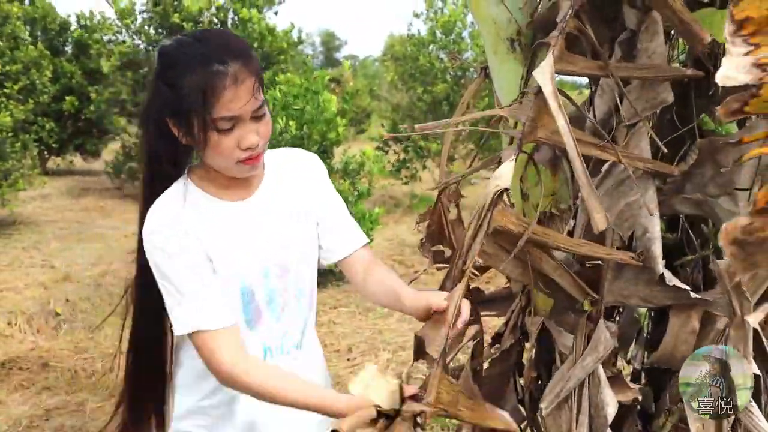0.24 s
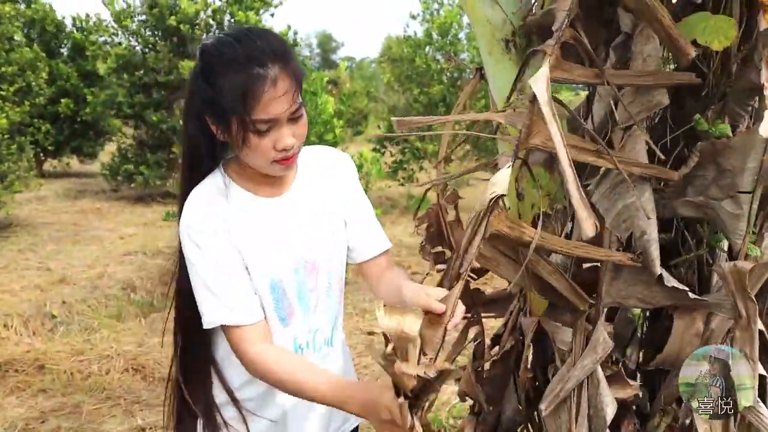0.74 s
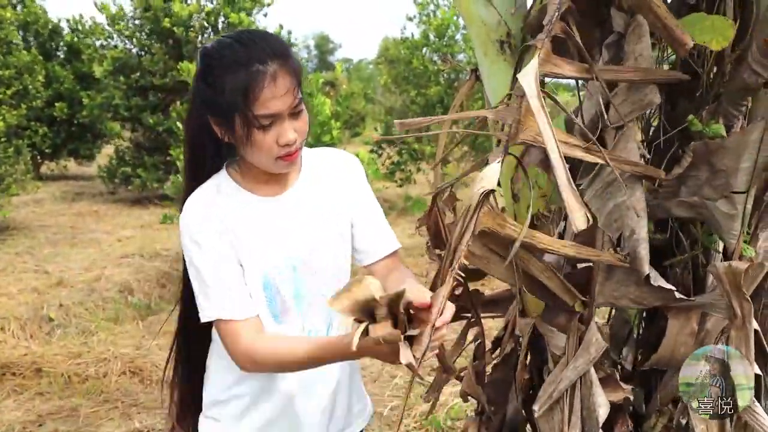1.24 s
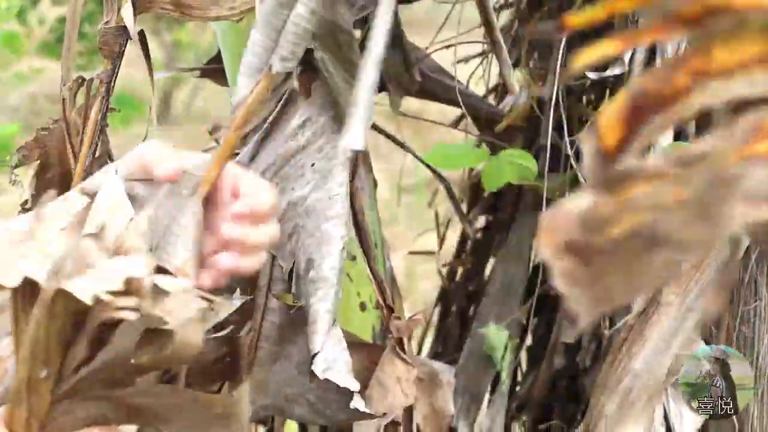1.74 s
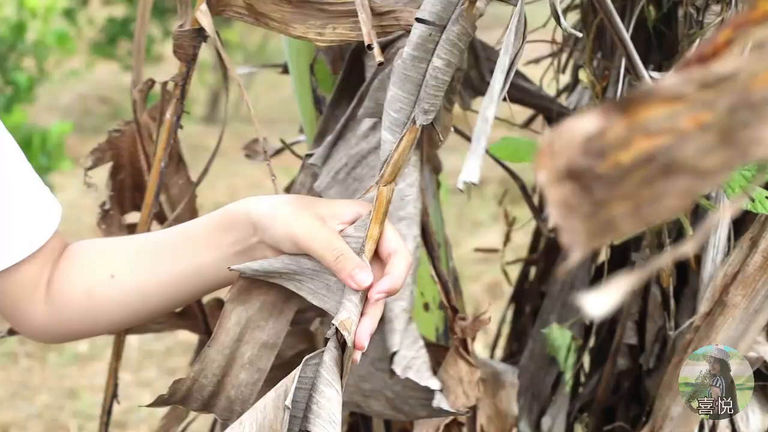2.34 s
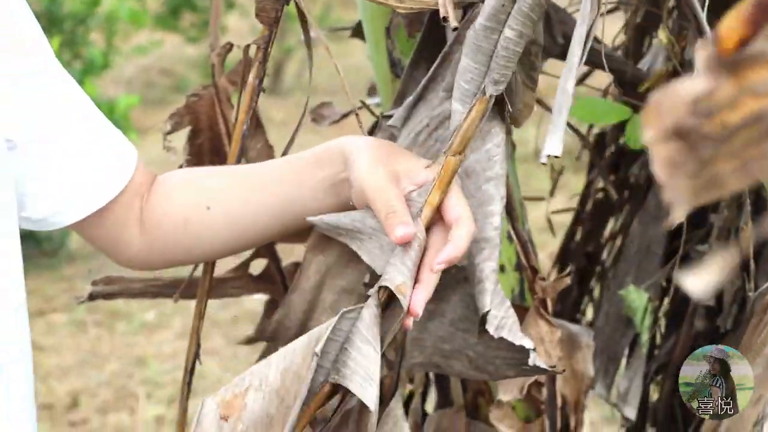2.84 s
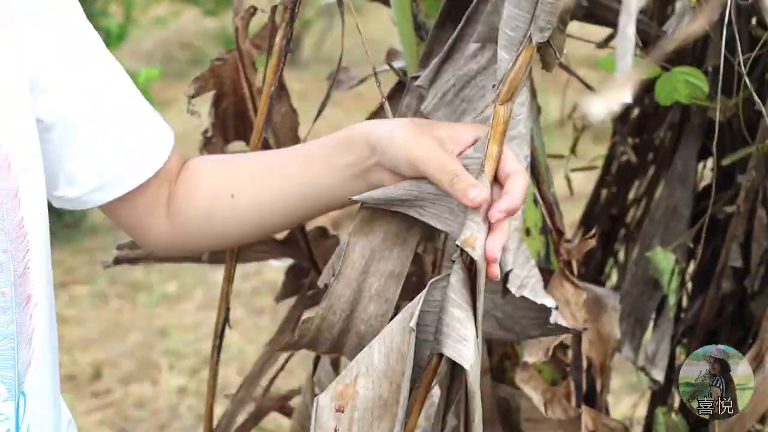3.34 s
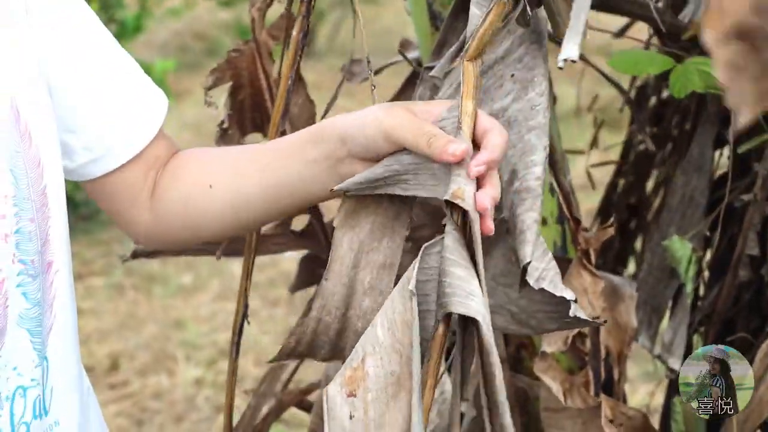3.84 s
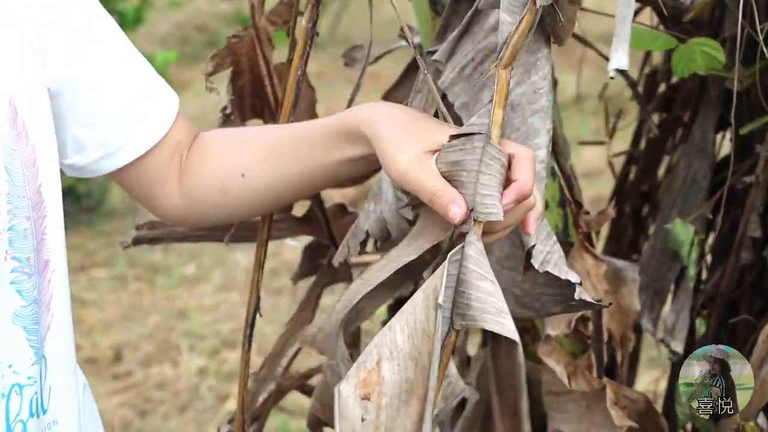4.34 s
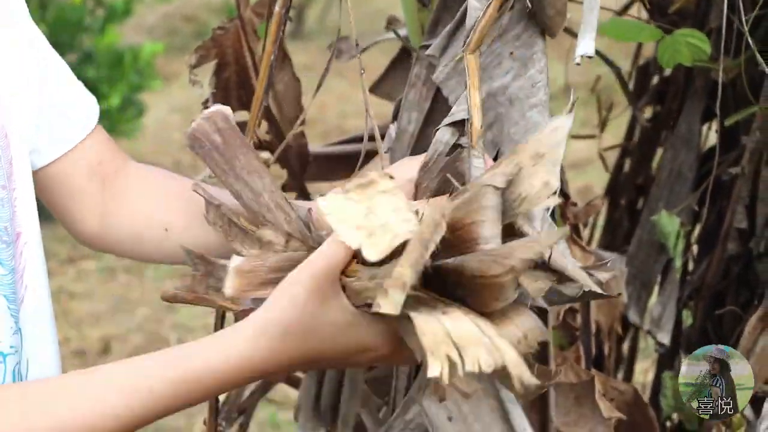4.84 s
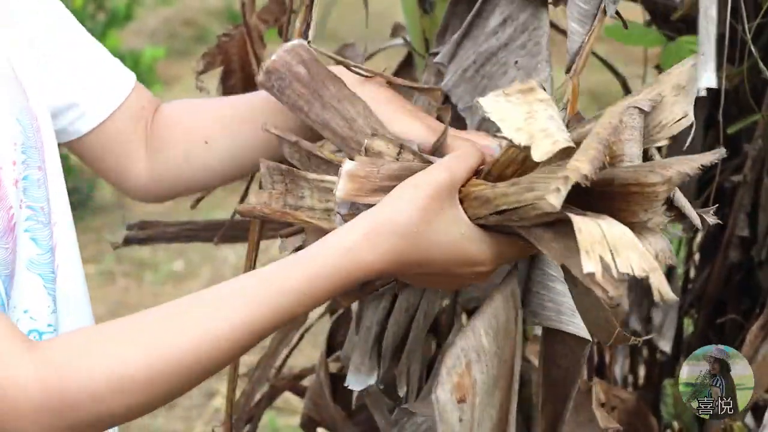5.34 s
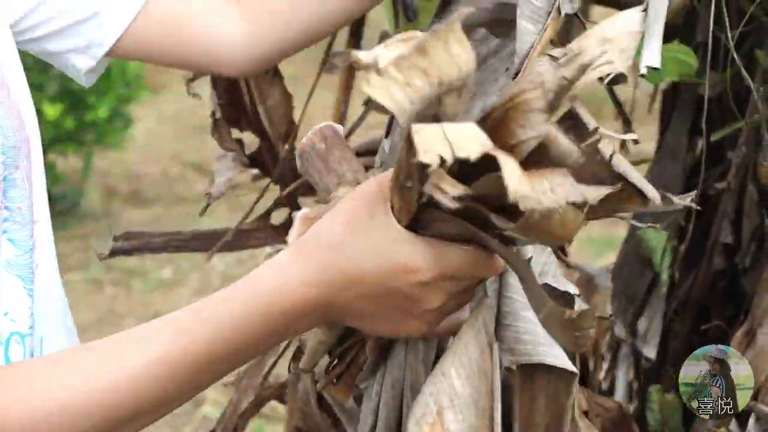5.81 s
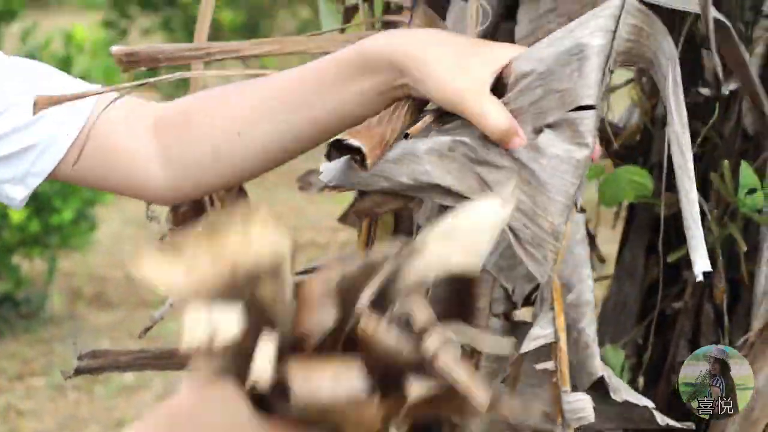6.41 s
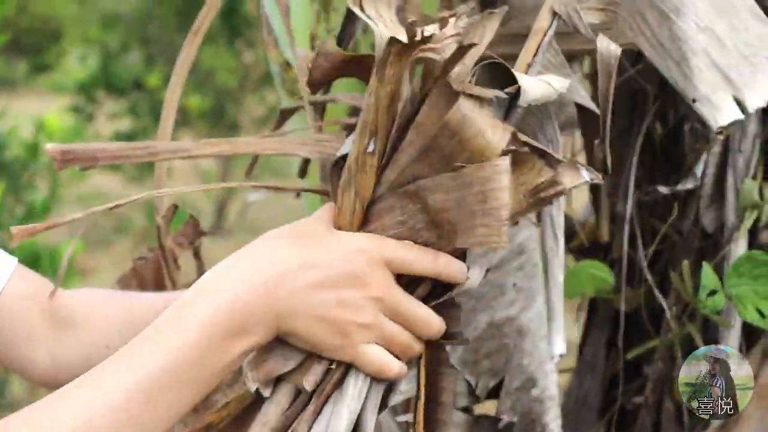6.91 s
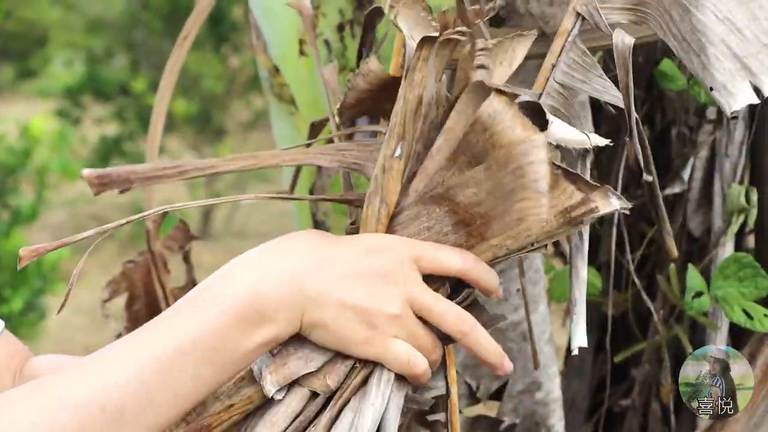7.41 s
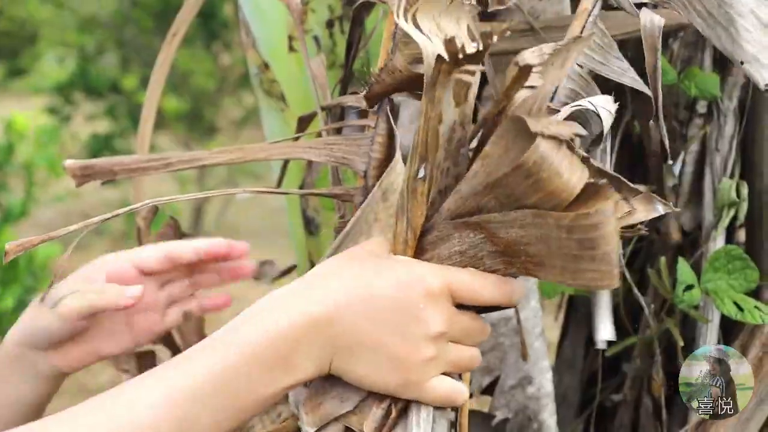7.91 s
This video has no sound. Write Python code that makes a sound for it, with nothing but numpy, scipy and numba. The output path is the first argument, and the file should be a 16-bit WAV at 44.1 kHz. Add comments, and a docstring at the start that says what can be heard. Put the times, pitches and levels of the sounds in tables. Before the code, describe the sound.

Dry dead leaves crackle, snap and rustle as they are pulled and crushed by hand, with wind rumbling on the microphone.

```python
"""Dry leaves pulled off a stalk and crushed into a bundle.

Each crack is a sputtering burst of fibre fractures that rings the stiff blade. Countless small cracks
and rubbing make the rustle; the bundle drums dully under both, and leaf edges scrape now and then.
Wind buffets the microphone over a faint open-air hush."""
import sys
import numpy as np
from scipy import signal
from scipy.fft import rfft, irfft
from scipy.io import wavfile
from scipy.ndimage import uniform_filter1d
from numba import njit

SR = 44100
rng = np.random.default_rng(int(sys.argv[2]) if len(sys.argv) > 2 else 0)


def int16_out(signal):
    """Quantize to a 16-bit WAV file."""
    q = np.round(np.clip(np.atleast_2d(signal).T, -1, 1) * 32767)
    wavfile.write(sys.argv[1], SR, q.astype(np.int16))


N = 359856

# Spectra of air, wind, bundle, blade and fibres. Each row: frequency in Hz, relative density in dB.
HUSH_SPECTRUM = [(30, -15), (65, 2), (100, -5.5), (300, -4.5), (1500, -7.5), (4500, -31), (5500, -31),
                 (15000, -62)]
WIND_SPECTRUM = [(8, -11), (20, -0.5), (35, -3.5), (70, -16), (130, -25), (200, -33), (400, -70)]
BUNDLE_SPECTRUM = [(80, -23), (200, -9), (450, 0.5), (800, -9.5), (1600, -27)]
BLADE_SPECTRUM = [(200, -31.5), (500, -1.5), (1400, -1.5), (2900, -1.5), (4500, -2.5), (5300, -11.5),
                  (7000, -54)]
FIBRE_SPECTRUM = [(4000, -26), (5400, -7.5), (6300, 0), (7200, -4), (9000, -3.5), (12000, -12),
                  (15800, -19.5)]
# Wind strength. Each row: time in seconds, level in dB.
WIND_LEVELS = [(0.0, -35.5), (0.13, -23.5), (0.34, -36.5), (0.39, -23.5), (0.7, -45), (1.0, -30.5),
               (1.25, -48), (1.45, -49), (1.48, -20), (1.64, -24.5), (2.29, -24), (2.39, -14.5),
               (2.57, -21), (2.75, -19.5), (2.95, -28), (3.34, -25), (3.38, -11), (3.52, -25.5),
               (3.75, -16.5), (3.95, -25), (4.3, -23.5), (4.5, -30), (4.82, -38), (5.0, -30), (5.68, -50),
               (5.75, -32), (6.04, -52), (6.91, -72), (8.16, -44)]
# Low drumming of the bundle. Each row: time in seconds, gain in dB.
BUNDLE_GAINS = [(0, 1.5), (.9, 2), (3.0, -2), (5.2, -1), (5.6, 5.5), (5.95, 6.5), (6.3, 1.5), (8.16, -2)]
# One leaf edge sliding over another. Each row: start and length in seconds, level in dB, rasp in Hz.
SCRAPES = [(0.067, 0.06, -38, 2100), (3.808, 0.096, -28.5, 2050), (8.078, .05, -30.5, 3660)]
# Squeezes and pulls. Each row: start and length of the hold in seconds, rustle level in dB,
# treble relative to that level in dB.
SQUEEZES = [(0.0, 0.12, -35.5, -8), (0.223, 0.047, -42, -5), (0.358, 0.012, -35, -10.5),
            (0.43, .17, -29, -8), (0.625, 0.12, -31, -5.5), (0.838, 0.045, -17.5, -8),
            (.925, 0.036, -22.5, -7), (0.988, 0.077, -32, -4), (1.107, .06, -37.5, -15),
            (1.198, 0.063, -35.5, -6), (1.318, 0.1, -29, -7.5), (1.552, 0.12, -30.5, -10.5),
            (1.673, 0.088, -26.5, -11), (1.866, 0.16, -30, -8.5), (2.112, 0.038, -24, -7),
            (2.188, 0.11, -31, -15), (2.383, 0.26, -36, -11.5), (2.631, 0.16, -28.5, -12.5),
            (2.78, .19, -28, -8.5), (2.997, .06, -36.5, -5), (3.105, 0.093, -24, -15),
            (3.3, 0.11, -36.5, -10), (3.486, 0.12, -41.5, -7), (3.658, 0.024, -32.5, -10),
            (3.817, 0.26, -31, -11.5), (4.042, .1, -28.5, -7.5), (4.148, 0.02, -20.5, -11.5),
            (4.194, 0.093, -26, -9), (4.415, 0.017, -33, -5), (4.527, .03, -36.5, -3),
            (4.638, 0.034, -32.5, -3), (4.73, 0.096, -33, -3.5), (4.877, 0.025, -27.5, -10.5),
            (4.942, 0.054, -37, -9), (5.034, 0.14, -26, -9.5), (5.198, 0.41, -31, -9.5),
            (5.617, 0.073, -41.5, -3), (5.81, 0.064, -33, -13.5), (5.848, 0.25, -26.5, -9.5),
            (6.188, 0.062, -23, -8), (6.364, .06, -31.5, -8), (6.548, 0.087, -30, -3),
            (6.627, 0.1, -26, -8), (6.77, 0.077, -38, -12), (6.904, 0.26, -29.5, -9.5),
            (7.238, 0.027, -22, -9.5), (7.405, 0.13, -31.5, -10), (7.588, 0.12, -32, -7.5),
            (7.824, 0.047, -25, -12), (7.903, 0.052, -33, -10.5), (8.054, .12, -33, -11.5)]
# Loud cracks. Each row: start in seconds, level in dB, blade resonance in Hz,
# treble relative to the level in dB, T60 in seconds.
CRACKS = [(0.588, -13, 1660, -4.5, 0.037), (0.655, -25, 3800, 5, 0.018), (0.7304, -21.5, 1480, -17, 0.1),
          (0.7603, -10.5, 1950, -4.5, 0.046), (0.771, -19, 1970, -4, 0.025),
          (0.8051, -9, 3480, -11.5, 0.091), (0.8215, -17, 3980, -6, 0.054),
          (0.838, -12.5, 2900, -10.5, 0.042), (0.8557, -8.5, 4500, -13, 0.026),
          (0.862, -15, 2230, -1, 0.078), (0.8886, -12, 560, -11, 0.047), (0.8999, -25, 1930, -3, 0.021),
          (0.95, -13, 1810, -8, 0.036), (1.1994, -19, 3450, -13, 0.03), (1.3816, -17.5, 3380, -12, 0.056),
          (1.4614, -17, 3180, -8.5, 0.045), (1.494, -21, 3740, -6, 0.013), (1.7783, -11, 3550, -8.5, 0.019),
          (1.8371, -13, 3560, -7, 0.046), (1.9033, -17.5, 2330, -4, 0.03), (1.954, -8.5, 3160, -6.5, 0.036),
          (1.9756, -8.5, 2340, -6, 0.032), (2.0792, -8, 2860, -2.5, 0.07), (2.0962, -7, 3560, -10, 0.063),
          (2.103, -22, 3060, -6, 0.072), (2.169, -15.5, 1070, -16, 0.069), (2.3267, -14.5, 3370, -8, 0.024),
          (2.5846, -12.5, 3200, -16.5, 0.027), (2.7976, -18, 2100, -8, 0.034),
          (2.838, -6.5, 2310, -9, 0.016), (2.8867, -9, 2530, -6.5, 0.081), (2.9448, -10, 2700, -5.5, 0.047),
          (2.955, -21, 3500, -4, 0.053), (2.9615, -17, 3750, -10, 0.043), (2.9935, -20, 1430, -12, 0.026),
          (3.096, -12.5, 4730, -6, 0.14), (3.118, -21.5, 3800, 2, 0.25), (3.1312, -14, 2500, -13, 0.16),
          (3.1497, -11, 4350, -10, 0.037), (3.685, -18.5, 3590, -6, 0.04), (3.9096, -19, 2070, -8, 0.044),
          (3.9987, -16.5, 4120, -8, 0.06), (4.0124, -18, 4630, -11, 0.022), (4.0447, -16, 1620, -9, 0.038),
          (4.0667, -17, 2330, -8, 0.045), (4.1014, -6.5, 1110, -11, 0.02), (4.1418, -9, 2590, -6.5, 0.038),
          (4.149, -8.5, 2770, -6, 0.021), (4.1572, -5.5, 1680, -6, 0.035), (4.178, -10, 2400, -3, 0.0084),
          (4.292, -4, 3920, -12, 0.0055), (4.323, -16.5, 3720, 0, 0.017),
          (4.4192, -13.5, 1860, -4.5, 0.033), (4.5343, -19, 3830, -2, 0.021),
          (4.5963, -20.5, 2200, -4.5, 0.054), (4.6047, -13, 3740, -7, 0.022),
          (4.659, -8.5, 2270, -4, 0.038), (4.6683, -8, 3160, -2.5, 0.029), (4.7237, -11, 2870, -2, 0.012),
          (4.7299, -11.5, 3630, -2.5, 0.036), (4.7453, -6.5, 3050, -4, 0.016),
          (4.7504, -13.5, 1410, -4, 0.056), (4.757, -18, 3670, -7, 0.022), (4.7783, -21, 4180, -8, 0.018),
          (4.834, -19, 3200, -6, 0.032), (4.8903, -10.5, 3230, -10.5, 0.02), (5.04, -22.5, 3050, -1, 0.049),
          (5.079, -11, 700, -4.5, 0.022), (5.0977, -12.5, 2760, -7, 0.015),
          (5.106, -16.5, 1690, -14, 0.027), (5.1485, -14, 2930, -8.5, 0.044), (5.224, -20, 1520, -8, 0.057),
          (5.2876, -24, 1790, -11, 0.027), (5.3423, -13, 1370, -7, 0.019), (5.3522, -18.5, 1870, -9, 0.021),
          (5.38, -19, 1330, -6, 0.072), (5.403, -22, 2000, -10, 0.043), (5.51, -15, 1250, -11, 0.024),
          (5.5397, -13.5, 2800, -5.5, 0.046), (5.6387, -24, 2920, -7.5, 0.097),
          (5.799, -14.5, 1360, -18, 0.035), (5.8644, -13, 1520, -13, 0.044),
          (5.908, -6.5, 1620, -20, 0.032), (5.9642, -14.5, 1520, 0.5, 0.022),
          (5.9685, -16, 3000, -9, 0.025), (5.991, -17, 1330, -26, 0.12), (6.0223, -17, 1780, -4, 0.022),
          (6.056, -11, 1650, -7, 0.02), (6.08, -11.5, 1500, -21, 0.03), (6.096, -9, 3130, -11, 0.023),
          (6.1193, -9.5, 2900, -6, 0.1), (6.1258, -12, 3130, -11, 0.014), (6.1418, -10.5, 2780, -5, 0.11),
          (6.2196, -10, 2900, -13, 0.033), (6.231, -13, 3700, -8, 0.056), (6.2384, -14, 3630, -14, 0.03),
          (6.3039, -8, 2840, -15, 0.052), (6.3188, -23, 4080, -4, 0.047), (6.3269, -13.5, 4140, -10, 0.022),
          (6.371, -18, 2350, -15, 0.023), (6.396, -6, 1540, -8.5, 0.021), (6.4253, -18, 1920, -5, 0.03),
          (6.448, -17.5, 3280, -6, 0.086), (6.5123, -17.5, 2410, -19, 0.028),
          (6.5186, -14, 4240, 2.5, 0.0079), (6.5312, -4.5, 2170, -6, 0.026),
          (6.5706, -8, 3400, -7.5, 0.064), (6.5933, -7.5, 1800, -6.5, 0.041),
          (6.6642, -9, 1360, -12, 0.057), (6.6843, -13, 795, -7, 0.017), (6.6954, -18, 2480, -12, 0.036),
          (6.709, -19, 1540, -7, 0.034), (6.7174, -19, 2300, -15, 0.019), (6.7279, -20.5, 2920, -9, 0.022),
          (6.7383, -19, 1450, -17, 0.014), (6.7813, -8.5, 1340, -12, 0.035),
          (6.9038, -10.5, 1440, -7.5, 0.027), (6.9355, -19, 1630, -2, 0.043),
          (6.9607, -12.5, 1370, -6.5, 0.042), (6.9785, -14, 2640, -12, 0.038),
          (7.0316, -18, 4490, -12, 0.041), (7.0462, -14.5, 2590, -13, 0.061),
          (7.0558, -19, 3970, -8, 0.036), (7.071, -17, 4190, -7.5, 0.073), (7.1674, -21, 1430, -2, 0.017),
          (7.193, -13, 1060, -15, 0.026), (7.2386, -13, 1680, -7, 0.032), (7.257, -19, 2740, -4, 0.1),
          (7.287, -20.5, 2820, -2, 0.022), (7.3262, -21.5, 3070, -15, 0.018),
          (7.476, -20, 3100, -17, 0.018), (7.482, -13.5, 3170, -7.5, 0.022),
          (7.5886, -6.5, 1770, -29, 0.014), (7.6183, -21, 2260, -19, 0.039), (7.684, -20, 3440, -6, 0.033),
          (7.707, -16.5, 2650, -6, 0.023), (7.8627, -13, 2580, -5.5, 0.025), (8.123, -14, 3040, -6, 0.055)]


def undb(db):
    return 10 ** (np.asarray(db) / 20)


def curve(points):
    """(Seconds, value) points interpolated to every sample."""
    return np.interp(np.arange(N) / SR, *np.transpose(points))


def colour(x, spectrum):
    """Minimum-phase filter that keeps the power of white noise."""
    hz, db = np.transpose(spectrum)
    gain = undb(np.interp(np.log(np.linspace(1, SR / 2, 4097)), np.log(hz), db))
    cepstrum = irfft(np.log(gain / np.sqrt(np.mean(gain ** 2))))
    cepstrum[1:4096] *= 2
    cepstrum[4097:] = 0
    return signal.fftconvolve(x, irfft(np.exp(rfft(cepstrum))))[:N]


def wander(rate_hz):
    """Random steps, smoothed twice; unit deviation."""
    width = int(SR / rate_hz)
    steps = np.repeat(rng.standard_normal(N // width + 1), width)
    smooth = uniform_filter1d(uniform_filter1d(steps, width), width)[:N]
    return smooth / np.std(smooth)


def fractures(sputter_db, rate_hz):
    """Two noises whose strength jumps together as single fibres let go."""
    noise = rng.standard_normal((2, N)) * undb(sputter_db * wander(rate_hz))
    return noise / np.std(noise)


@njit
def bursts(start_s, blade_gain, hz, fibre_gain, t60_s, noise, hold, q, ring, snap):
    """Each burst snaps, holds and decays, ringing the blade; the fibre treble dies sooner."""
    blade, fibre = np.zeros(N), np.zeros(N)
    for e in range(len(start_s)):
        start = int(start_s[e] * SR)
        tau_samples = t60_s[e] * SR / np.log(1000)
        g = np.tan(np.pi * hz[e] / SR)  # state-variable band-pass
        band_gain = ring * np.sqrt(1 + q / g) / q
        band_state, low_state, envelope = 0., 0., 1.
        for n in range(min(int(6 * tau_samples), N - start)):
            i = start + n
            if n > hold * tau_samples:
                envelope *= 1 - 1 / tau_samples
            onset = min(1., (n + 1) / 6) * (.75 + snap * np.exp(-n / 30))  # first fibre breaks hardest
            drive = onset * envelope * noise[0, i]
            band = (band_state + g * (drive - low_state)) / (1 + g * (g + 1 / q))
            band_state, low_state = 2 * band - band_state, low_state + 2 * g * band
            blade[i] += blade_gain[e] * (drive + band_gain * band) / np.sqrt(1 + 4 * ring ** 2)
            fibre[i] += fibre_gain[e] * onset * envelope ** 1.2 * noise[1, i]
    return blade, fibre


def hush(level_db=-45):
    """Faint, steady open-air noise."""
    return undb(level_db) * colour(rng.standard_normal(N), HUSH_SPECTRUM)


def wind(lurch_db=1.8):
    """Eddies press on the microphone: deep rumble that lurches in strength."""
    level_db = curve(WIND_LEVELS) + lurch_db * wander(rate_hz=14)
    return undb(level_db) * colour(rng.standard_normal(N), WIND_SPECTRUM)


def scrapes():
    """Stick-slip noise through one narrow resonance of the sliding edge."""
    out = np.zeros(N)
    friction = fractures(sputter_db=4.9, rate_hz=300)[0]
    for start_s, length_s, db, hz in SCRAPES:
        rasp = signal.lfilter(*signal.iirpeak(hz, Q=5, fs=SR), friction)
        progress = ((np.arange(N) / SR - start_s) / length_s).clip(0, 1)
        swell = np.sqrt(np.sin(np.pi * progress).clip(0))
        out += undb(db) * swell * rasp / np.std(rasp)
    return out


def bundle(crack_blade, rustle_blade):
    """Bunched leaves and stalk drum dully under cracks and rustle."""
    drive = undb(-14) * crack_blade + undb(-11) * rustle_blade
    return colour(undb(curve(BUNDLE_GAINS)) * drive, BUNDLE_SPECTRUM)


def handling(attack_db_per_s=298, release_db_per_s=224, idle_db=-45.5, idle_treble_db=-12.5):
    """Blade and fibre gains: each squeeze swells, holds and settles to an idle stir."""
    t = np.arange(N) / SR
    blade_power, fibre_power = undb(idle_db) ** 2, undb(idle_db + idle_treble_db) ** 2
    for start_s, hold_s, db, treble_db in SQUEEZES:
        attack_db = attack_db_per_s * (start_s - t).clip(0)
        release_db = release_db_per_s * (t - start_s - hold_s).clip(0)
        power = undb(db - attack_db - release_db) ** 2
        blade_power += power
        fibre_power += power * undb(treble_db) ** 2
    return np.sqrt(blade_power), np.sqrt(fibre_power)


def rustle(count=3200):
    """Small random cracks over rubbing noise, both following the hands."""
    when, size, pitch, brightness, decay = rng.random((count, 5)).T
    size_db = -6 - 3 * np.log(size).clip(-3.5, 0)  # many faint, few strong
    hz = 900 * 2 ** (2.64 * pitch)
    treble_db = 21 * (brightness - .5)
    t60_s = 0.0033 + 0.037 * decay ** 2
    blade, fibre = bursts(when * N / SR, undb(size_db), hz, undb(size_db + treble_db), t60_s,
                          fractures(sputter_db=0.99, rate_hz=800), hold=0.17, q=11., ring=0.24, snap=0.19)
    rub_db = -4.5 + 2.15 * wander(45)
    flicker_db = np.array([4.05 * wander(30), 1.7 * wander(30)])
    blade_rub, fibre_rub = undb(rub_db + flicker_db) * rng.standard_normal((2, N))
    blade, fibre = blade + blade_rub, fibre + fibre_rub
    blade_gain, fibre_gain = handling()
    return blade_gain * blade / np.std(blade), fibre_gain * fibre / np.std(fibre)


def cracks():
    """Loud snaps and tears, each ringing the blade at its own hollow pitch."""
    start_s, db, hz, treble_db, t60_s = np.transpose(CRACKS)
    noise = fractures(sputter_db=2.5, rate_hz=900)
    return bursts(start_s, undb(db), hz, undb(db + treble_db), t60_s, noise,
                  hold=0.22, q=3.9, ring=0.35, snap=0.26)


def scene():
    crack_blade, crack_fibre = cracks()
    rustle_blade, rustle_fibre = rustle()
    blades = colour(crack_blade + rustle_blade, BLADE_SPECTRUM)
    fibres = colour(crack_fibre + rustle_fibre, FIBRE_SPECTRUM)
    return (hush() + scrapes() + wind() + bundle(crack_blade, rustle_blade) + blades + fibres)[None]


def record(dry, ceiling=0.97, cutoff_hz=15700):
    """Hard limit on the loudest snaps, then a steep low-pass."""
    lowpass = signal.ellip(12, .2, 85, cutoff_hz, fs=SR, output="sos")
    return signal.sosfilt(lowpass, np.clip(dry, -ceiling, ceiling))


dry = scene()
out = record(dry)
int16_out(out)
```